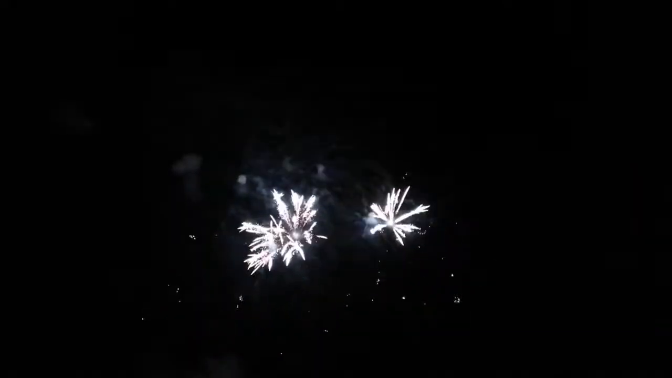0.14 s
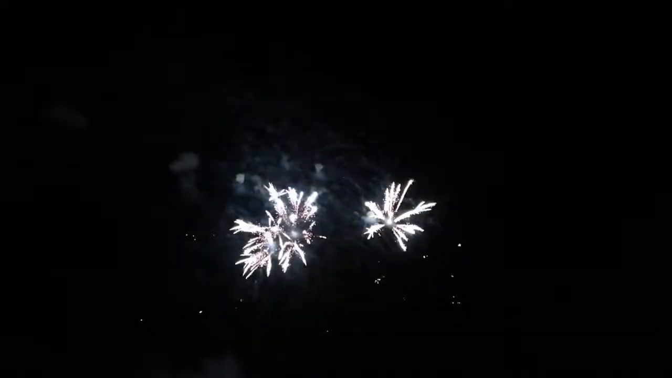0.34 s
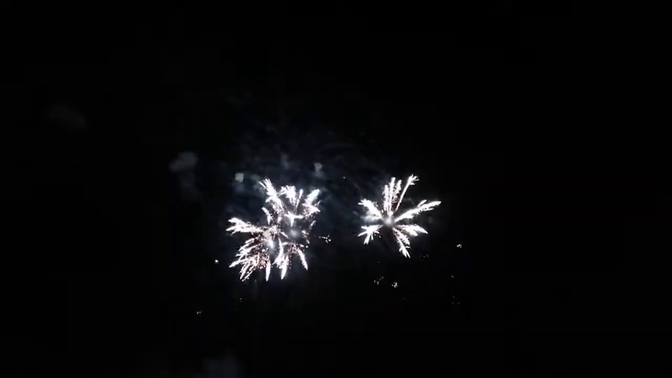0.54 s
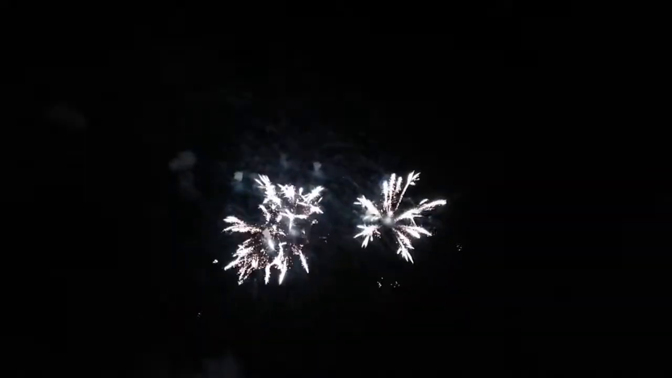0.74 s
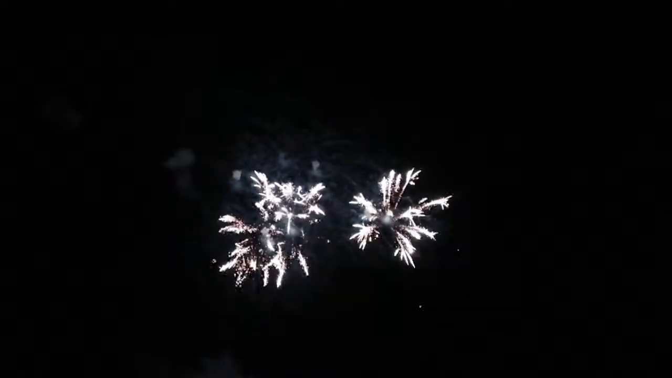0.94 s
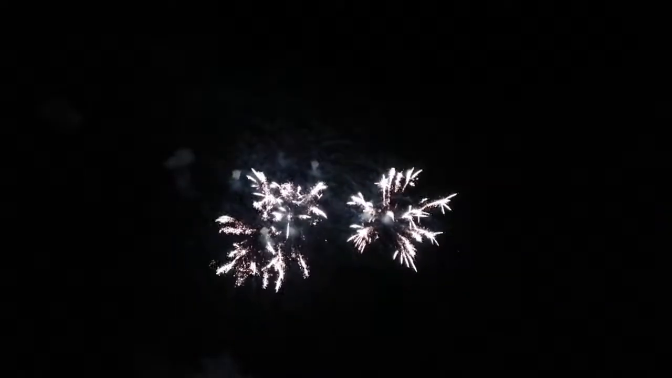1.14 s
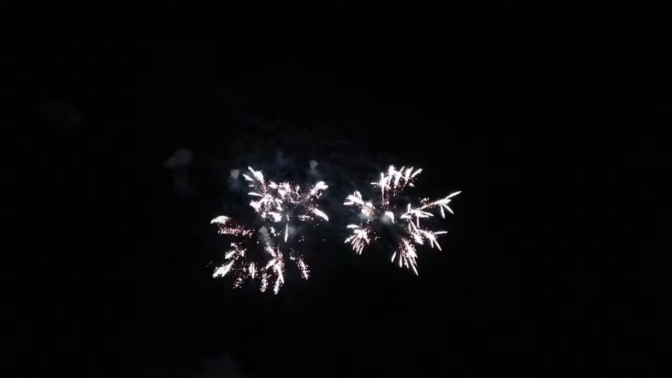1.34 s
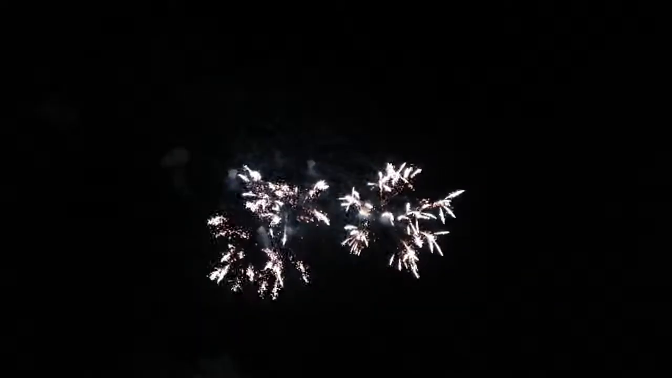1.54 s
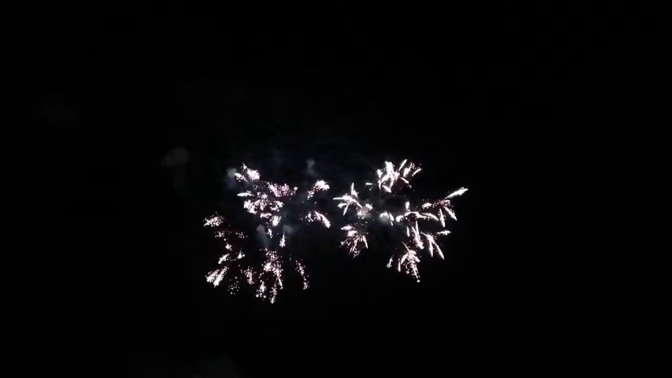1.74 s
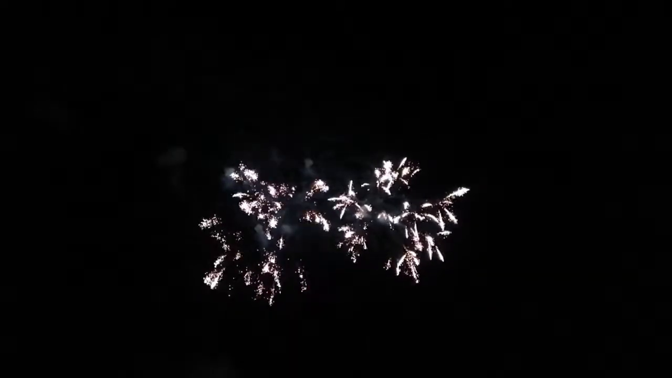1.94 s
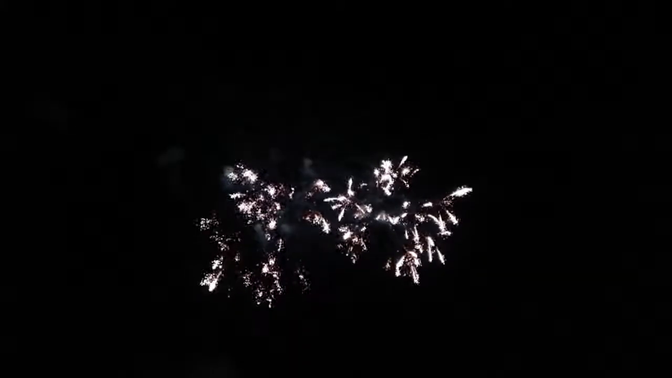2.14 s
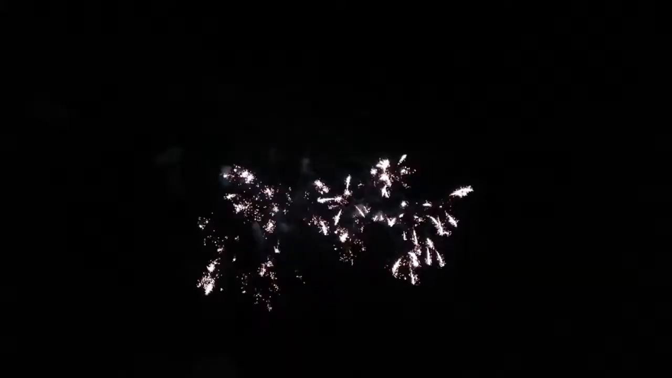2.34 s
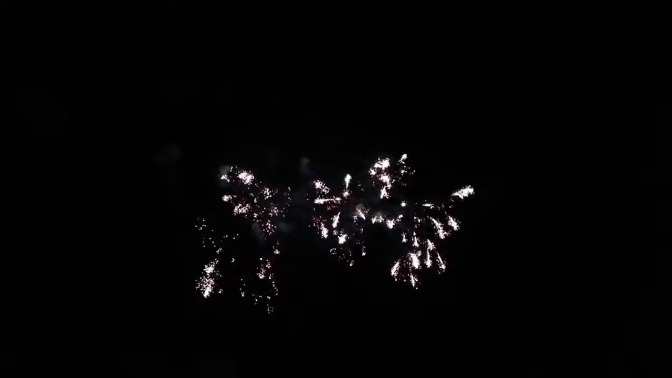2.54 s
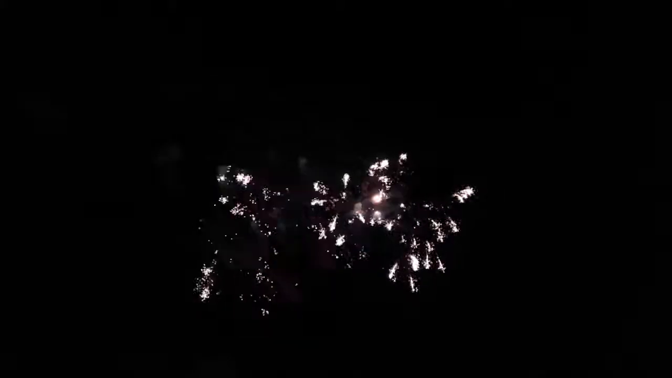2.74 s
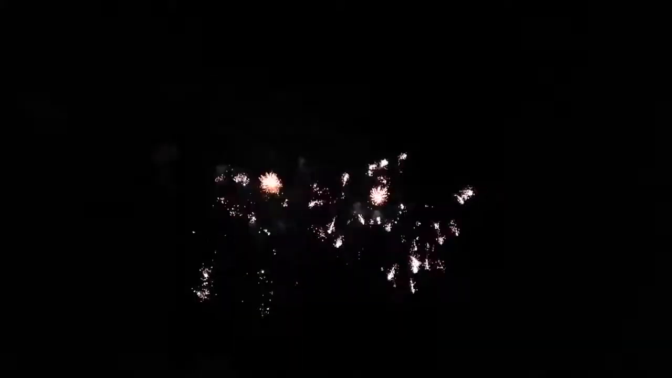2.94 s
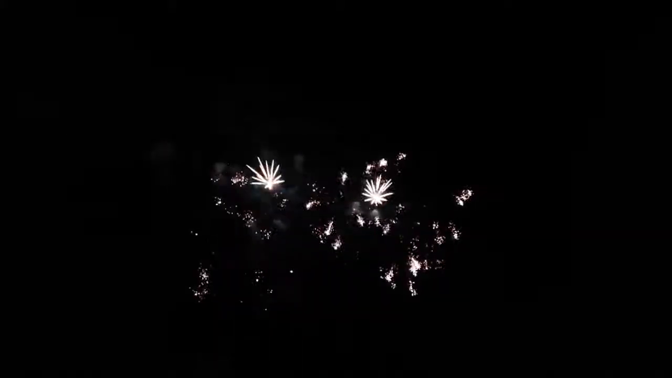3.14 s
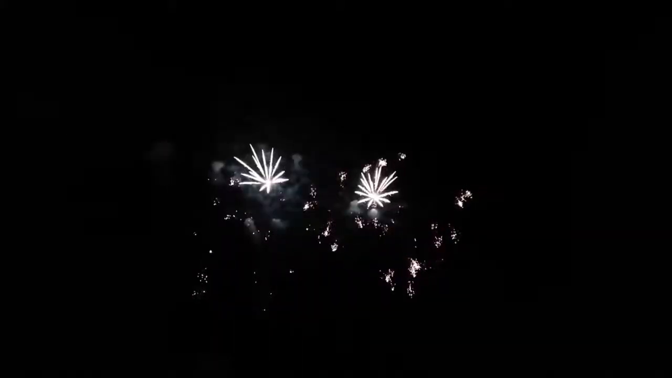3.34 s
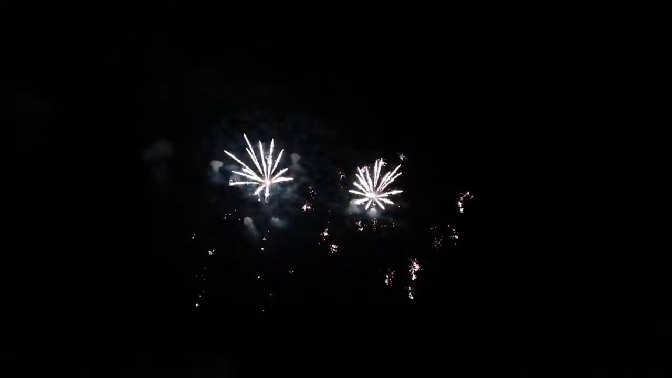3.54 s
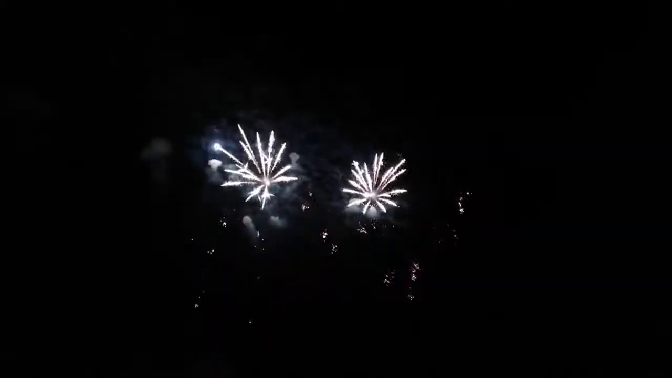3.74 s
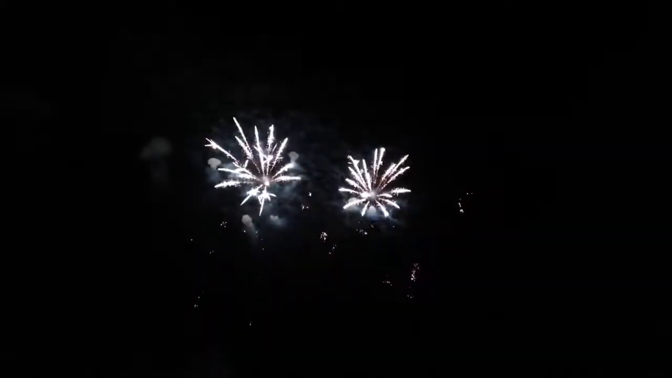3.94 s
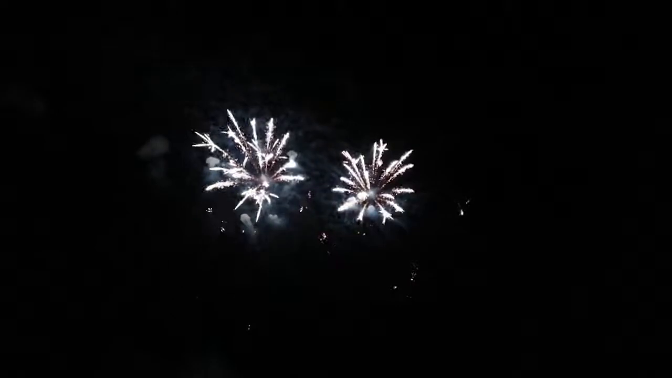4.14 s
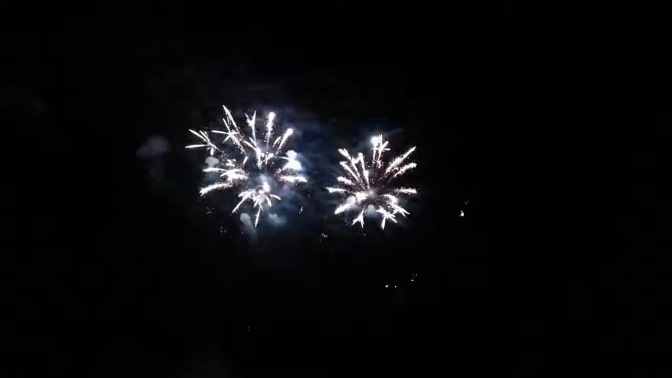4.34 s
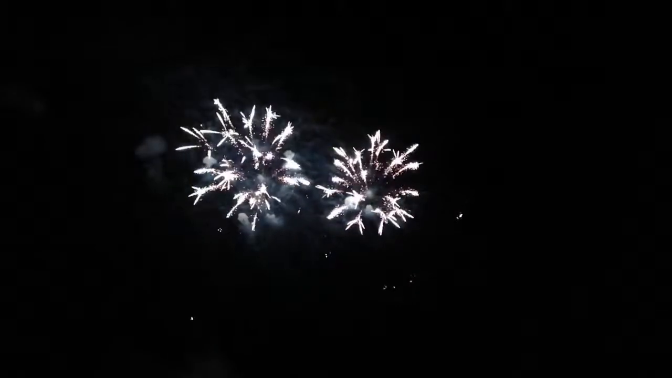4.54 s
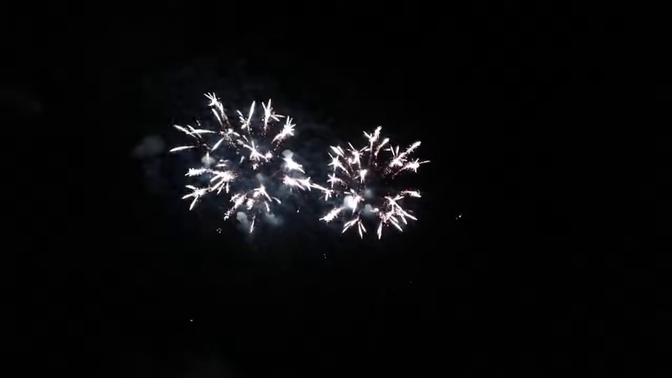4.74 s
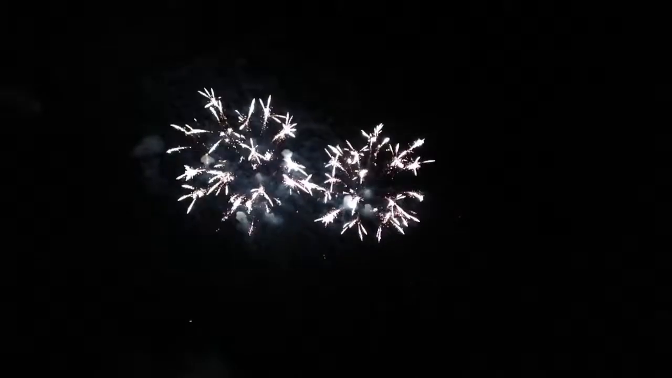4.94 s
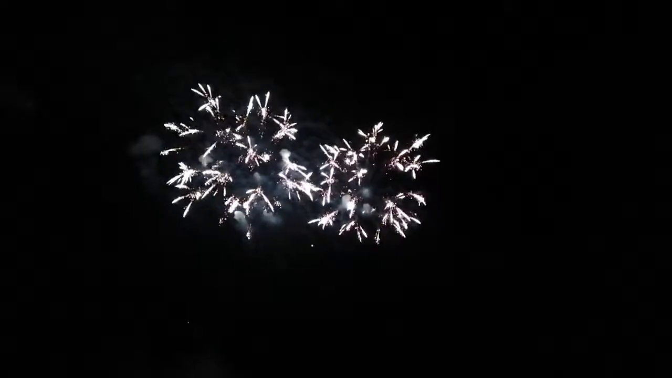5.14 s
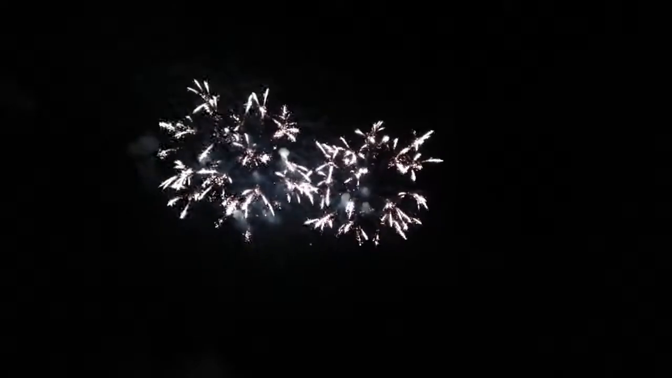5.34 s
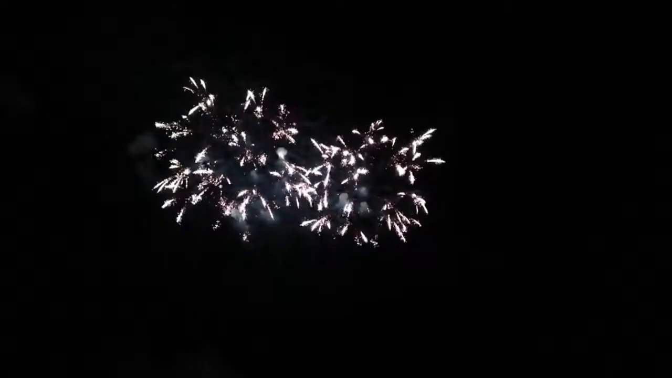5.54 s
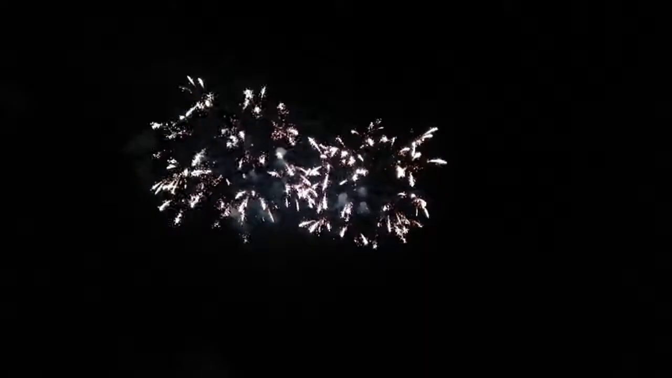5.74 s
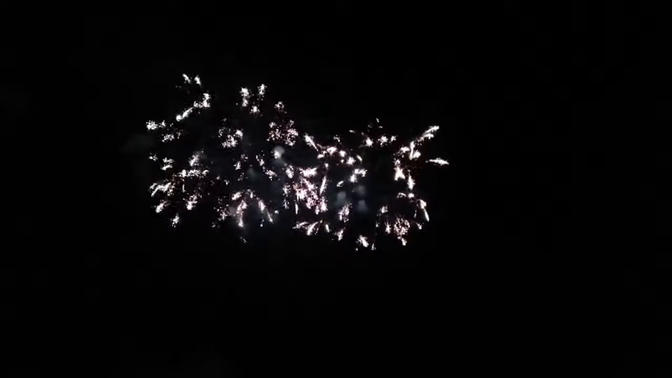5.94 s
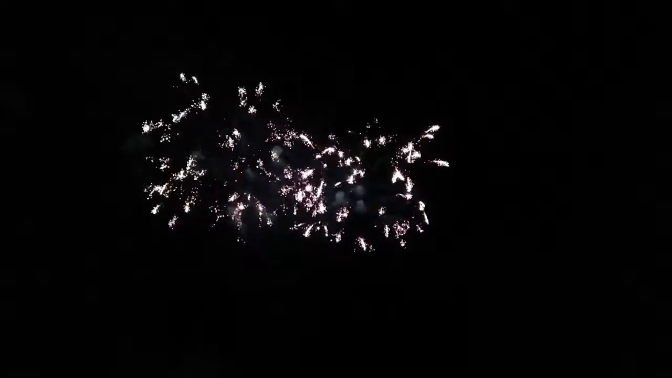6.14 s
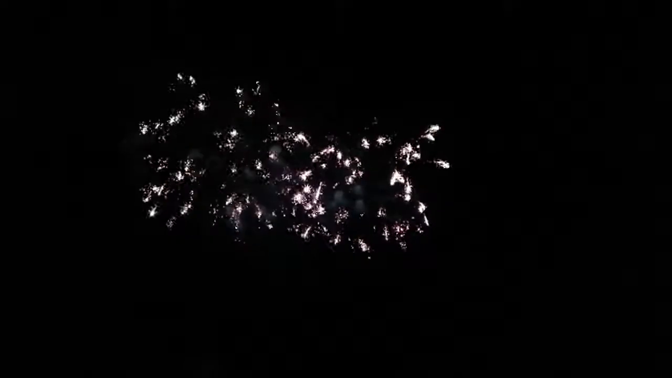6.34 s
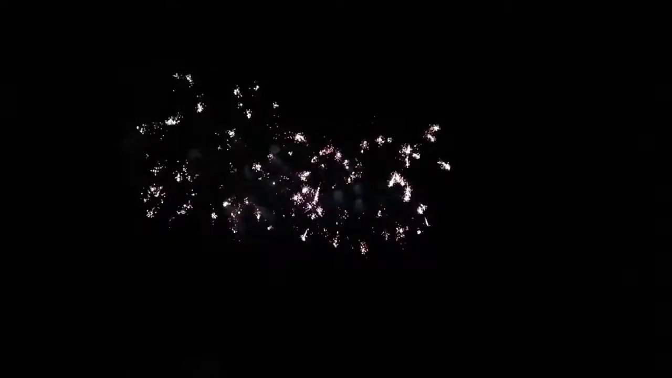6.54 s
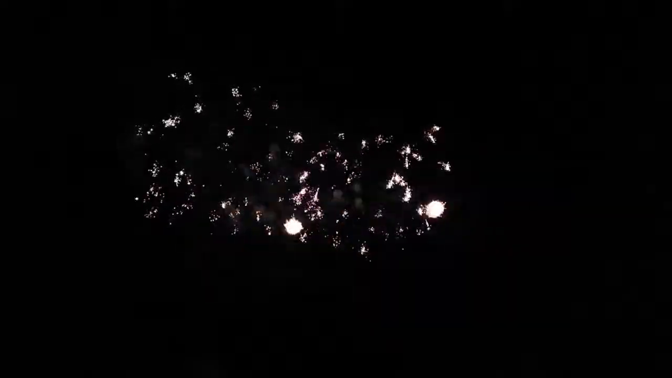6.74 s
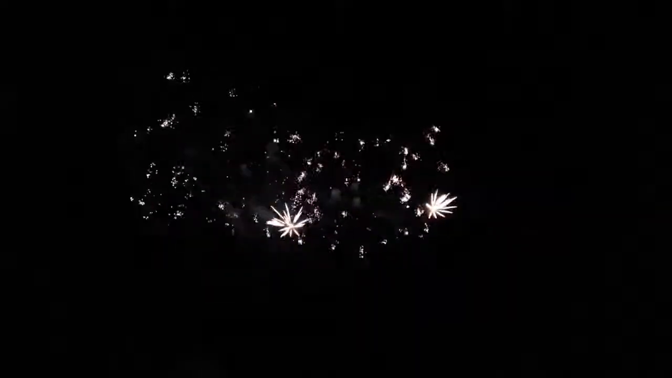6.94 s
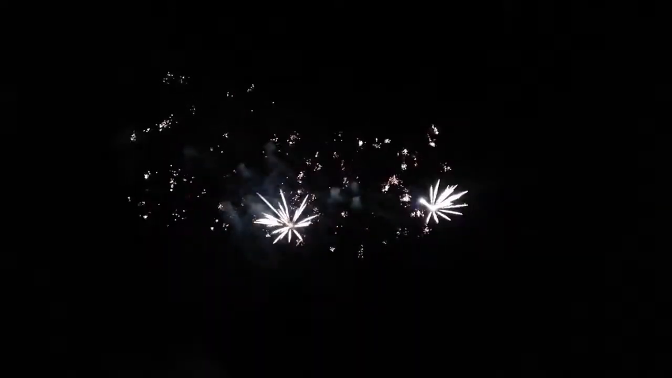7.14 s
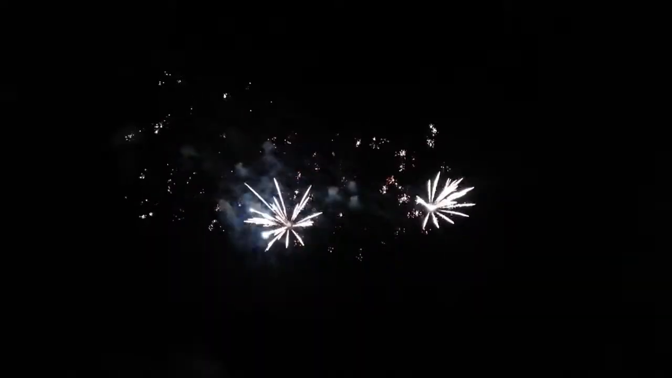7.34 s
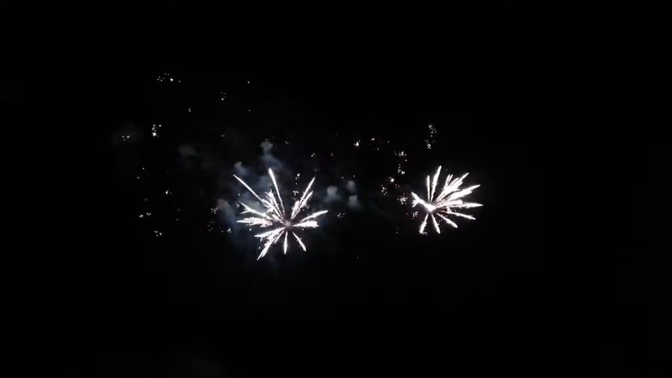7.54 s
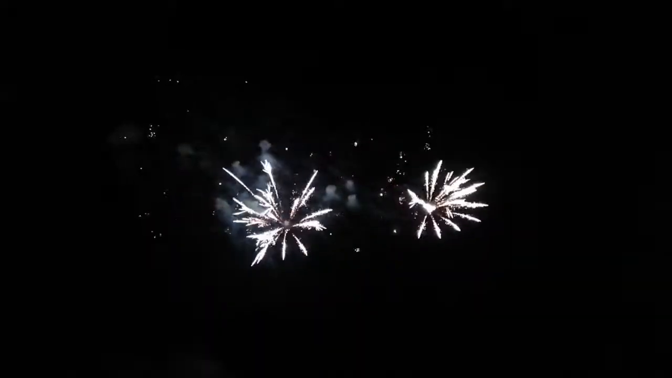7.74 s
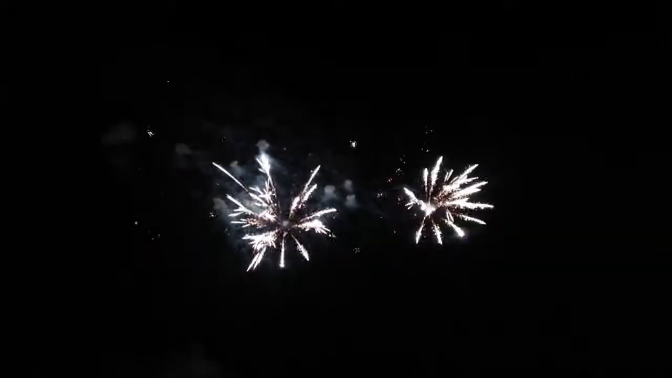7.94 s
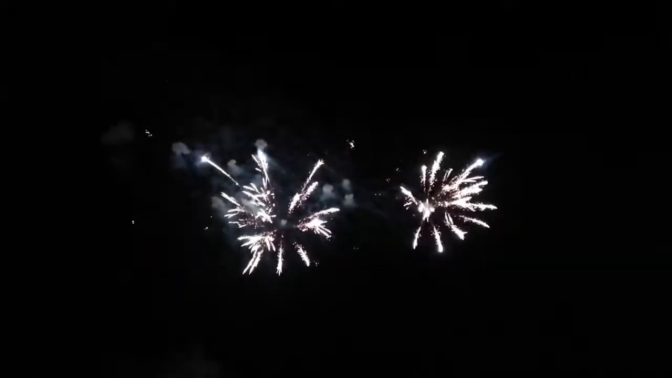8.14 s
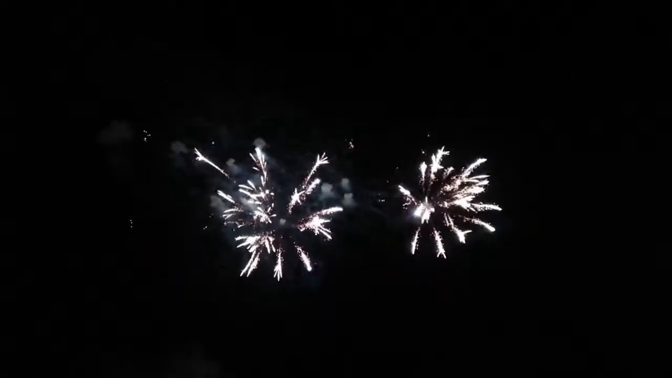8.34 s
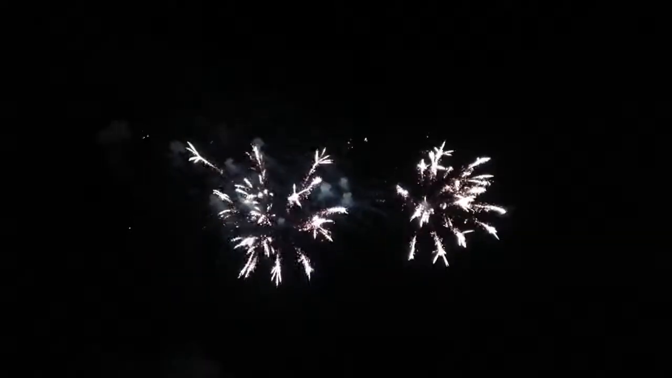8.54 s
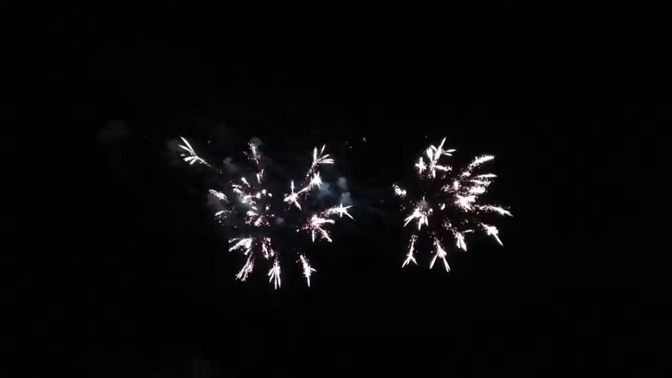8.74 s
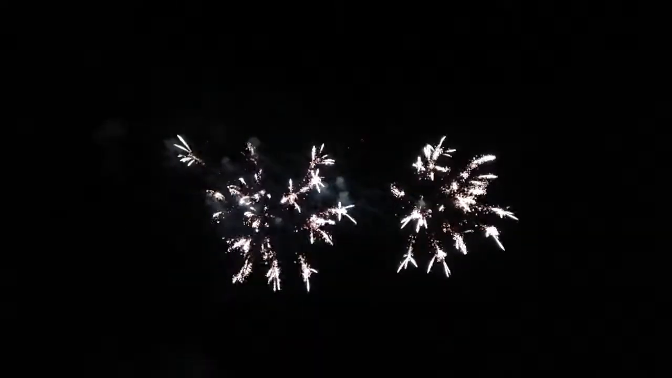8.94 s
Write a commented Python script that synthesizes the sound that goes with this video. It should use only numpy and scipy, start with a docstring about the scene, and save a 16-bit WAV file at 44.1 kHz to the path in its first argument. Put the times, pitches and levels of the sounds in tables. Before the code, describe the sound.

A single loud aerial bang, then two tight double bangs seconds apart, with mortar thumps, star crackle and fading thunder between.

```python
"""Open land at night, under a firework: one shell bursts overhead, then two close pairs.
Each bang is a shock front and suction, answered by a wall and scattered echoes; thunder rolls after it.
Mortars on the ground thump on a slow heave of air as they lift shells. Splitting stars pop as tiny
blasts; burning stars sizzle and crackle as dense random sparks. Night air and hiss lie beneath."""
import sys
import numpy as np
from scipy import signal
from scipy.fft import rfft, irfft, next_fast_len
from scipy.io import wavfile

SR = 44100
rng = np.random.default_rng(int(sys.argv[2]) if len(sys.argv) > 2 else 0)


def wav_record(signal):
    """Record a signal, one row per channel, as 16-bit PCM in the file named by sys.argv[1]."""
    frames = np.transpose(np.atleast_2d(signal))
    bounded = np.clip(frames, -1, 1)
    # unit amplitude maps onto the largest positive 16-bit level
    quanta = np.round(bounded * 32767).astype(np.int16)
    wavfile.write(sys.argv[1], SR, quanta)


N = 397341
TIME = np.arange(N) / SR
TAIL = TIME[:SR]   # time axis of short sounds and responses, 1 s


def from_db(db):
    """Decibels to gain."""
    return 10 ** (np.asarray(db) / 20)


def rms_one(x):
    """Scale to rms 1."""
    return x / np.sqrt(np.mean(x ** 2) + 1e-20)


def at_hz(points, hz, column=1):
    """Read a table on a log-frequency axis."""
    points = np.array(points)
    return np.interp(np.log(hz), np.log(points[:, 0]), points[:, column])


def butter(x, hz, kind, order=2):
    """Causal low-, high- or band-pass."""
    sos = signal.butter(order, np.clip(hz, 10, .45 * SR), kind, fs=SR, output="sos")
    return signal.sosfilt(sos, x + 1e-18)


def late(x, delay_s):
    """Delay a short mono sound."""
    return np.interp(TAIL - delay_s, TAIL, x, left=0)


def add(out, start_s, sound):
    """Mix a stereo sound in at a given time."""
    i = max(round(start_s * SR), 0)
    out[:, i:i + sound.shape[1]] += sound[:, :N - i]


def band_one(x, low_hz, high_hz):
    """Scale so that one band of the mid signal has rms 1."""
    return x / np.std(butter(x.mean(0), [low_hz, high_hz], "band"))


def wander(hz, depth_db):
    """Random gain, slower than hz, with an rms swing of depth_db."""
    return from_db(depth_db * rms_one(butter(rng.standard_normal(N), hz, "low")))


def sparks(per_s, size_db, size=N):
    """Two unrelated trains of random clicks of uneven size; rms 1."""
    excess = np.minimum(rng.exponential(1, (2, size)), 4)
    clicks = from_db(size_db * excess) * rng.choice([-1, 1], (2, size))
    struck = rng.random((2, size)) < per_s / SR
    return rms_one(clicks * struck)


# side against mid for sound from all round: freq_hz, side_to_mid_db
WIDTH = [(60, -26), (110, -18.5), (200, -13.5), (380, -0.5), (700, 2.5), (1290, -5.5), (2400, -1.5),
         (8000, 1)]


def spread(pair, colour):
    """Two unrelated signals become a coloured stereo field, alike in the bass and apart higher up."""
    size = next_fast_len(pair.shape[1])
    hz = np.maximum(np.fft.rfftfreq(size, 1 / SR), 1)
    mid, side = rfft(pair, size)
    width = from_db(at_hz(WIDTH, hz))
    both = np.array([mid + width * side, mid - width * side]) / np.hypot(1, width)
    return irfft(both * from_db(at_hz(colour, hz)), size)[:, :pair.shape[1]]


def scatter(table, onset_s, per_s=2500, size_db=1.5):
    """Response of many small reflectors: a hail of uneven echoes, each octave dying at its own rate."""
    hail = sparks(per_s, size_db, size=SR) + .5 * rng.standard_normal((2, SR))
    bins = rfft(spread(hail, table))
    octave = np.log2(np.clip(np.fft.rfftfreq(SR, 1 / SR), 60, 15360) / 60)
    gather = 1 - np.exp(-(TAIL / onset_s) ** 2)
    out = 0
    for k in range(9):
        t60_s = at_hz(table, 60 * 2 ** k, column=2)
        fade = from_db(-60 * TAIL / t60_s) * gather
        band = irfft(bins * np.maximum(1 - abs(octave - k), 0), SR)
        out = out + band * fade / np.linalg.norm(fade)
    return out


def echo(x, response):
    """Send a short mono sound through a stereo response."""
    return signal.fftconvolve(x[None], response, axes=1)[:, :SR]


def arrive(x, lag_s, pan_db):
    """A direct sound reaches the right microphone first; negative pan_db favours the right."""
    return np.array([late(x, lag_s) * from_db(pan_db / 2), x * from_db(-pan_db / 2)])


def swing(hz, damping):
    """An explosion: pressure jumps, sinks into suction and swings back to rest, with no net push."""
    phase = 2 * np.pi * hz * TAIL
    return np.exp(-np.minimum(damping * phase, 40)) * (np.cos(phase) - damping * np.sin(phase))


def blast(front_db, front_s, suction_db, hz, bass_hz, suction_lag_s):
    """A large explosion: a steep shock front, then a deep suction that swings back to rest."""
    phase = 2 * np.pi * hz * TAIL
    suction = late(-np.exp(-np.minimum(.27 * phase, 40)) * np.sin(phase), suction_lag_s)
    front = np.exp(-np.minimum(TAIL / front_s, 40))
    pressure = from_db(front_db) * front + from_db(suction_db) * suction
    return butter(pressure, bass_hz, "high", order=1)


# still night air and microphone hiss, relative spectrum: freq_hz, density_db
NIGHT_COLOUR = [(25, -18), (60, -11), (150, 2), (300, -9), (700, -6.5), (2000, -11.5), (6000, -26.5),
                (11000, -37.5), (13500, -21), (15500, -18)]


def night(level_db=-74):
    """Steady coloured noise: still air and microphone hiss."""
    return from_db(level_db) * rms_one(spread(rng.standard_normal((2, N)), NIGHT_COLOUR))


# thunder after a burst or launch: report_s, time_to_crest_s, crest_db, fall_db_per_s
ROLLS = [(-0.35, .3, -50.5, 57), (0.268, 0.38, -51, 28), (0.77, 0.2, -60.5, 13.5), (3.679, 0.47, -48.5, 56),
         (4.7, 0.39, -61.5, 25), (7.6, 0.3, -43.5, 19)]
# thunder, relative spectrum: freq_hz, density_db
ROLL_COLOUR = [(30, -24.5), (60, -15), (110, -2.5), (180, 2), (250, -3.5), (400, -13.5), (800, -19.5),
               (1500, -32.5), (3000, -40.5), (8000, -59.5)]


def rolling(lumps_db=1.25, lumps_hz=14, rise_db_per_s=6, linger_db=-22.5, linger_fall_db_per_s=13):
    """Far echoes merge into low, lumpy thunder that builds after each report, sinks and lingers faintly."""
    power = 0
    for report_s, to_crest_s, crest_db, fall_db_per_s in ROLLS:
        since_s = TIME - report_s - to_crest_s
        # the farthest echoes linger under the crest
        lingering_db = linger_db - linger_fall_db_per_s * since_s
        sinking_db = np.maximum(-fall_db_per_s * since_s, lingering_db)
        roll_db = crest_db + np.minimum(rise_db_per_s * since_s, sinking_db)
        power = power + (TIME > report_s) * from_db(roll_db) ** 2
    returns = sparks(per_s=450, size_db=0.5) + 0.65 * rng.standard_normal((2, N))
    thunder = band_one(spread(returns, ROLL_COLOUR), 90, 350)
    return np.sqrt(power) * wander(lumps_hz, lumps_db) * thunder


# sizzle of the stars, relative spectrum: freq_hz, density_db
SIZZLE_COLOUR = [(100, -24), (200, -9), (400, -8.5), (650, -8), (900, -5.5), (1250, -4), (2200, -1.5),
                 (3300, -4), (5000, -12), (7000, -24), (10000, -39), (14000, -59)]
# sizzle loudness, 3-7 kHz: time_s, level_db
SIZZLE_LEVEL = [(0.0, -71), (0.26, -76.5), (0.33, -58.5), (0.56, -63.5), (1.15, -64.5), (1.3, -61.5),
                (1.48, -65.5), (2.96, -66.5), (3.6, -69), (4.35, -73.5), (4.8, -69), (5.4, -64),
                (6.0, -69.5), (6.55, -67), (7.45, -70.5), (7.85, -70), (8.22, -75), (9.0, -70)]


def sizzle(waver_hz=12, waver_db=0.66):
    """Countless sparks merge into a sizzle, which wavers as the stars burn unevenly."""
    level = from_db(np.interp(TIME, *np.transpose(SIZZLE_LEVEL)))
    fine = sparks(per_s=3500, size_db=5.5) + 1.5 * rng.standard_normal((2, N))
    fine = band_one(spread(fine, SIZZLE_COLOUR), 3000, 7000)
    return level * wander(waver_hz, waver_db) * fine


# coarse crackle, relative spectrum: freq_hz, density_db
CRACKLE_COLOUR = [(100, -4), (400, 6), (800, 5), (1250, 4), (2000, 2.5), (3500, -15), (7000, -59),
                  (12000, -56)]
# many stars break up together: start_s, length_s, typical_pop_peak_db, crackle_db
FLURRIES = [(0.368, 0.096, -42, -54.5), (0.64, 0.265, -43.5, -57), (1.095, 0.16, -38, -61),
            (1.602, 0.2, -45, -70), (4.229, 0.12, -53, -68), (4.589, 0.39, -43.5, -67),
            (5.021, 0.11, -40.5, -67.5), (5.16, 0.21, -44, -62.5), (7.837, 0.31, -58, -64),
            (8.323, 0.386, -49, -69), (8.841, 0.15, -46, -60.5)]


def crackle(attack_s=0.029, release_s=0.086):
    """Coarser, duller sparks set in as stars break up in a flurry, hold and die away."""
    coarse = sparks(per_s=190, size_db=3.0) + 0.3 * rng.standard_normal((2, N))
    coarse = band_one(spread(coarse, CRACKLE_COLOUR), 900, 2200)
    level = 0
    for start_s, length_s, _, crackle_db in FLURRIES:
        attack = np.clip((TIME - start_s) / attack_s, 0, 1)
        release = np.exp(-np.clip((TIME - start_s - length_s) / release_s, 0, 20))
        level = np.maximum(level, from_db(crackle_db) * attack * release)
    return level * coarse


def flurry_pops(per_s=29, typical_hz=1080, typical_scatter_db=2, spread_db=4):
    """Within a flurry further stars split at uneven intervals; rows like those of the single stars."""
    rows = []
    for start_s, length_s, typical_db, _ in FLURRIES:
        chance = rng.standard_normal(size=(40, 4))
        for k, (when, strength, pitch, scattered) in enumerate(chance):
            after_s = (k + .5 + .3 * when) / per_s
            if after_s < length_s and start_s + after_s < TIME[-1]:
                peak_db = typical_db + spread_db * strength
                pitch_hz = typical_hz * np.exp(.15 * pitch)
                rows.append((start_s + after_s, peak_db, pitch_hz, typical_scatter_db + 3 * scattered))
    return rows


# splitting stars that stand out singly: start_s, peak_db, pitch_hz, scatter_db
SINGLE_POPS = [(0.1284, -43, 1450, -5), (0.356, -27.5, 1390, -5), (0.4015, -27, 1000, -7),
               (0.4087, -31.5, 980, -11), (0.4442, -25, 905, -1), (0.4959, -35, 970, 1),
               (0.6221, -22, 1590, -1), (0.6876, -34, 1180, -14), (0.7433, -30, 1050, -11),
               (1.106, -28, 1330, -1), (1.1162, -27, 1050, 1.5), (1.1871, -31.5, 895, 7),
               (1.6303, -35, 920, 4.5), (1.9987, -39.5, 1380, 2), (2.0609, -40, 970, 4),
               (2.1355, -46, 1050, 4), (4.2311, -35.5, 1000, -3), (4.2965, -40.5, 1200, -7),
               (4.3245, -36.5, 1060, 2.5), (4.3571, -39.5, 1100, -6), (4.5985, -37.5, 1141, 7),
               (4.6059, -37, 1130, -4), (4.8318, -38.5, 1066, 10.5), (4.8963, -35, 1060, 1),
               (4.9466, -41, 1147, 7), (4.9772, -34, 1090, 4), (5.1574, -39.5, 1080, 13),
               (5.1851, -35, 1087, 0), (5.2186, -35.5, 1080, 3.5), (5.2548, -36.5, 954, 3),
               (5.2759, -32, 960, -2), (5.3454, -34.5, 1556, 5), (5.3658, -35, 1300, 11.5),
               (5.4047, -34, 1020, 5.5), (5.4521, -32.5, 1100, 3), (5.4736, -34.5, 990, 2.5),
               (5.7523, -40.5, 970.5, 5.5), (5.8337, -45.5, 1103, 0), (8.1014, -36.5, 996, 1.5),
               (8.1091, -43, 1010, 9), (8.1195, -46, 1047, 11), (8.1435, -31.5, 710, -4),
               (8.1664, -40, 935, -6), (8.3271, -36.5, 990, 2), (8.3407, -30, 1250, -2),
               (8.3919, -33.5, 985, 0.5), (8.4135, -41, 950, -1)]
# echoes from things close by: freq_hz, relative_energy_db, t60_s
NEAR = [(50, -10.5, 0.043), (150, -9, 0.06), (380, -7, 0.034), (797.5, -3.5, 0.046), (2014, -3, 0.039),
        (4920, -2.5, 0.069), (14110, -4.5, 0.027)]
# echoes from the wider surroundings: freq_hz, relative_energy_db, t60_s
WIDE = [(40, -6.5, 0.23), (135, -13, .40), (350, -4.5, .35), (800, -9.5, .33), (2000, -5.5, 0.29),
        (5050, -7, 0.34), (14000, -8, 0.23)]


def pops(damping=0.47, air_hz=3200, ground_s=0.002093, ground_db=-11, wall_s=.0228, wall_db=-12.5,
         pan_db=-4.0, pan_spread_db=-1.5):
    """A splitting star is a tiny blast dulled by air, with ground bounce, wall echo and rustling echoes."""
    out = np.zeros((2, N))
    places = [scatter(NEAR, onset_s=0.001) + scatter(WIDE, onset_s=0.018) for _ in range(9)]
    stars = SINGLE_POPS + flurry_pops()
    # each star has its own place in the sky: its own balance, ground path and wall path
    sky = rng.standard_normal((len(stars), 3))
    for k, (start_s, peak_db, pitch_hz, scatter_db) in enumerate(stars):
        ground_path, side, wall_path = sky[k]
        pop = butter(swing(pitch_hz, damping), air_hz, "low", order=3)
        pop *= from_db(peak_db) / pop.max()
        bounce = from_db(ground_db) * late(pop, ground_s * np.exp(0.238 * ground_path))
        direct = arrive(pop + bounce, lag_s=.00002, pan_db=pan_db + pan_spread_db * side)
        rustle = echo(pop[:SR // 100], places[k % len(places)])
        heard = direct + from_db(scatter_db) * rustle
        add(out, start_s, heard)
        echo_s = min(start_s + wall_s * np.exp(.04 * wall_path), TIME[-1])
        add(out, echo_s, from_db(wall_db) * heard)
    return out


# mortars: start_s, peak_db, pitch_hz, dullness_cut_hz, ground_bounce_db, scatter_db, late_boom_db
LAUNCHES = [(0.7716, -18, 192, 1490, -3, 8.5, -53), (4.649, -22.5, 144, 1190, -32, 4, -58.5),
            (4.7665, -19.5, 146, 1500, -26, 6.5, -61), (8.8132, -20, 143, 1247, -19, 4, -57)]


def launches(front_s=0.00046, suction_db=-2, suction_lag_s=0.00074, heave_hz=38, heave_db=-21,
             bounce_s=0.0046, wall_s=0.0086, wall_db=-8, near_db=-3, wide_db=-3,
             boom_s=0.33, boom_width_s=0.083, boom_hz=70):
    """Rounded mortar thumps ride a slow heave of air; a low boom returns from far away."""
    out = np.zeros((2, N))
    for start_s, peak_db, pitch_hz, cut_hz, bounce_db, scatter_db, boom_db in LAUNCHES:
        heave = from_db(heave_db) * swing(heave_hz, damping=0.19)
        thump = blast(0, front_s, suction_db, pitch_hz, bass_hz=40, suction_lag_s=suction_lag_s)
        thump = butter(thump + heave, cut_hz, "low")
        thump *= from_db(peak_db) / thump.max()
        bounce = from_db(bounce_db) * late(thump, bounce_s)
        wall = from_db(wall_db) * late(thump, wall_s)
        direct = arrive(thump + bounce + wall, lag_s=0.0004, pan_db=0.0)
        near = from_db(near_db) * scatter(NEAR, onset_s=0.0035)
        wide = from_db(wide_db) * scatter(WIDE, onset_s=0.0086)
        around = from_db(scatter_db) * echo(thump, near + wide)
        boom = sparks(per_s=46, size_db=4.0, size=SR)[0]
        boom = rms_one(butter(boom, [boom_hz / 2, boom_hz], "band"))
        boom *= from_db(boom_db) * np.exp(-((TAIL - boom_s) / boom_width_s) ** 2 / 2)
        add(out, start_s, direct + around + boom)
    return out


# bursting shells: start_s, front_db, front_length_s, suction_db, suction_pitch_hz, bass_edge_hz,
# air_cut_hz, scatter_db, wall_echo_db, wall_delay_s
SHELLS = [(0.272, -3.5, 0.00038, -2.5, 158, 158.5, 6000, 1, -7, 0.022),
          (3.6839, 0.5, 0.0003, -2.5, 138, 70, 4200, 0, -4.5, .0230),
          (3.7231, -4.5, 0.00029, -9, 148, 70, 5460, 2.5, -5.5, 0.025),
          (7.6014, -1, 0.00024, -4, 165, 55.4, 4000, 2.5, -11.5, .0220),
          (7.6048, 3, 0.0001, -4, 144.5, 60, 4500, 1, -3, 0.021)]
# echoes from far away: freq_hz, relative_energy_db, t60_s
FAR = [(49.94, -31, 1.172), (300, -27, 0.4), (1200, -26.5, 1.2), (3997, -22.5, 1.082), (9200, -14.5, 0.71),
       (14000, -27, 0.95)]


def shells(suction_lag_s=0.00097, wall_hz=1700, top_hz=15000, near_db=1.5):
    """Each burst, a blast dulled by air, is answered by a wall and by everything around."""
    out = np.zeros((2, N))
    far = scatter(FAR, onset_s=.04)
    for (start_s, front_db, front_s, suction_db, pitch_hz, bass_hz,
         air_hz, scatter_db, wall_db, wall_s) in SHELLS:
        bang = blast(front_db, front_s, suction_db, pitch_hz, bass_hz, suction_lag_s)
        bang = butter(bang, air_hz, "low", order=1)
        bang = butter(bang, top_hz, "low")
        wall = from_db(wall_db) * late(butter(bang, wall_hz, "low", order=1), wall_s)
        direct = arrive(bang + wall, lag_s=.00007, pan_db=-0.5)
        near = from_db(near_db) * scatter(NEAR, onset_s=0.00027)
        wide = scatter(WIDE, onset_s=0.012, per_s=1700)
        response = from_db(scatter_db) * (near + wide) + far
        add(out, start_s, direct + echo(bang, response))
    return out


def scene():
    """Quiet night, thunder, burning stars, pops, launches and bursts."""
    return night() + rolling() + sizzle() + crackle() + pops() + launches() + shells()


# resonances of the microphone housing: freq_hz, width_hz, gain_db
HOUSING = [(660, 480, -1), (794, 110, 4.5), (1010, 120, -1.5), (1188.5, 160, 4), (1737, 110, 2),
           (2270, 850, -3), (3410, 310, 0)]


def record(dry, clip=.84, cutoff_hz=15800):
    """The housing colours the sound, the highest peaks are clipped and the top is cut."""
    for hz, width_hz, gain_db in HOUSING:
        ring = signal.lfilter(*signal.iirpeak(hz, hz / width_hz, fs=SR), dry)
        dry = dry + (from_db(gain_db) - 1) * ring
    top_cut = signal.ellip(10, .1, 80, cutoff_hz, fs=SR, output="sos")
    return signal.sosfilt(top_cut, np.clip(dry, -clip, clip))


dry = scene()
out = record(dry)
wav_record(out)
```